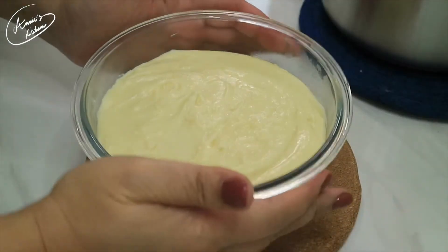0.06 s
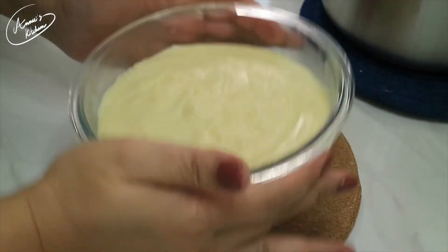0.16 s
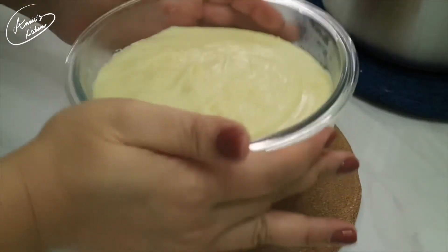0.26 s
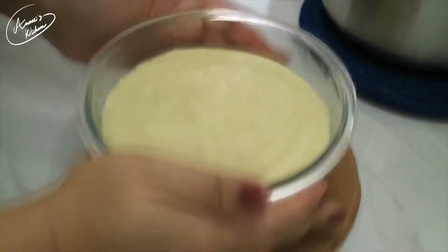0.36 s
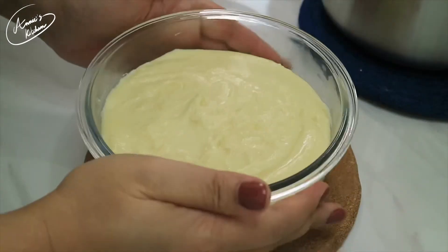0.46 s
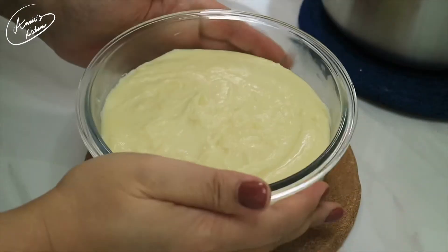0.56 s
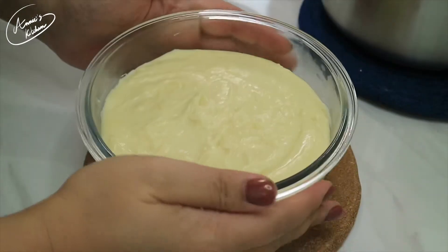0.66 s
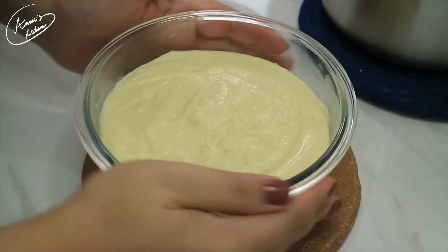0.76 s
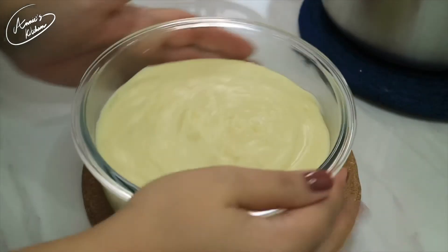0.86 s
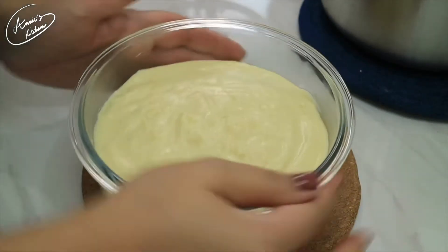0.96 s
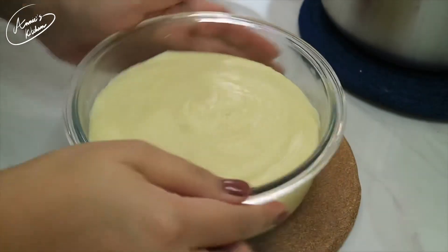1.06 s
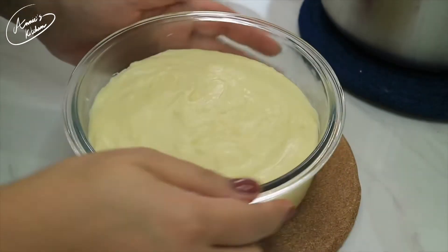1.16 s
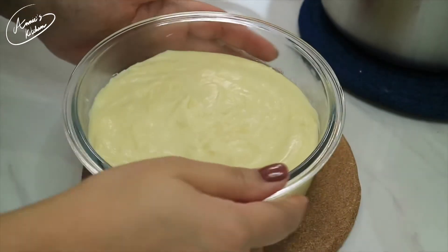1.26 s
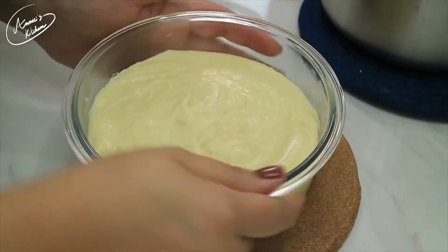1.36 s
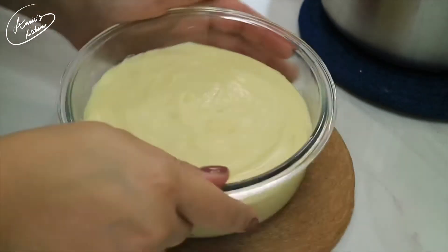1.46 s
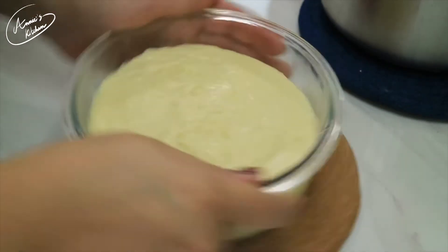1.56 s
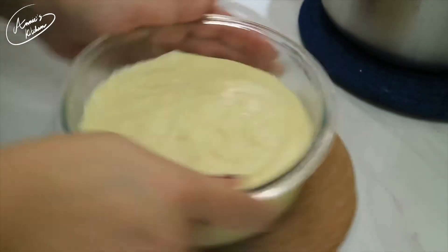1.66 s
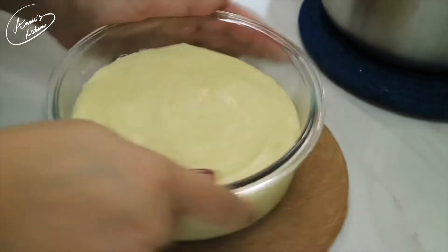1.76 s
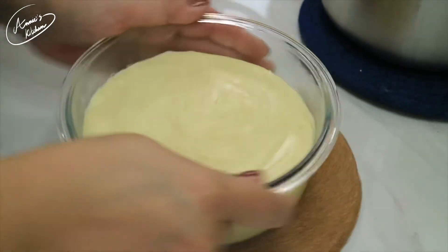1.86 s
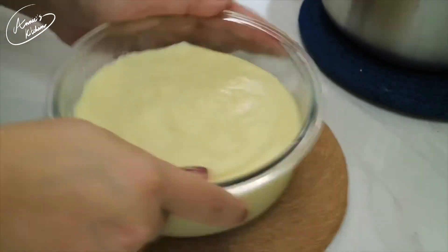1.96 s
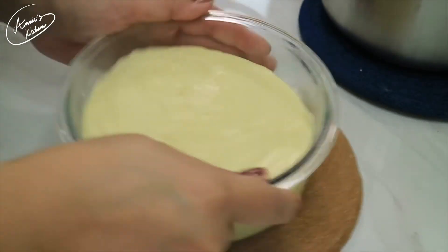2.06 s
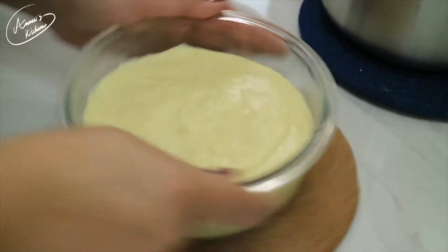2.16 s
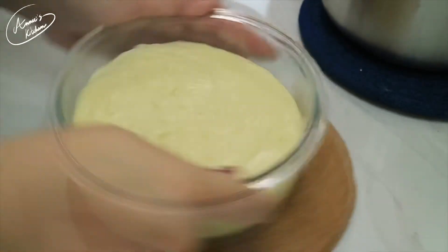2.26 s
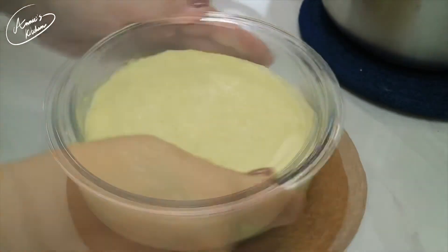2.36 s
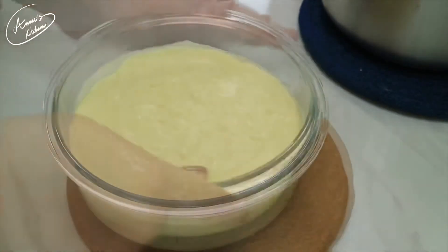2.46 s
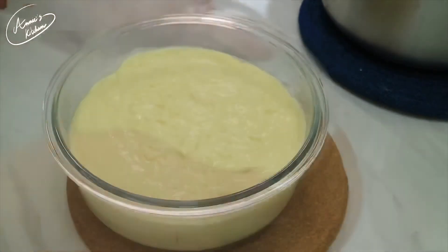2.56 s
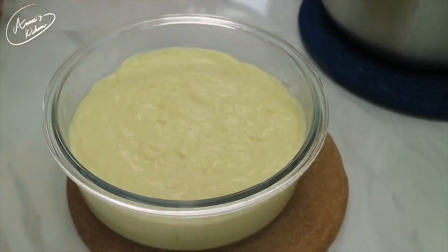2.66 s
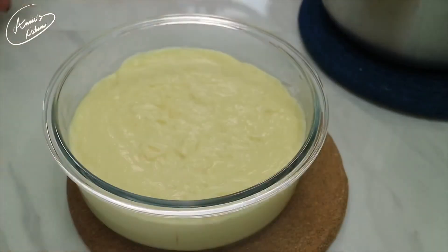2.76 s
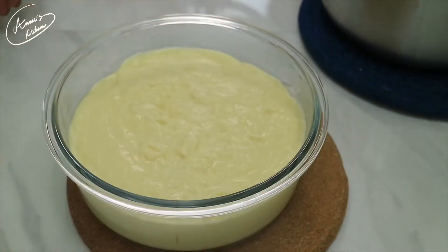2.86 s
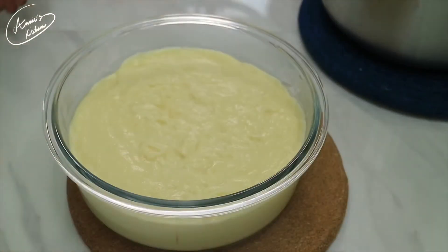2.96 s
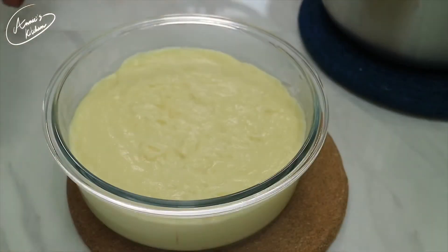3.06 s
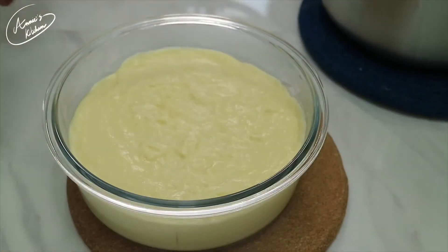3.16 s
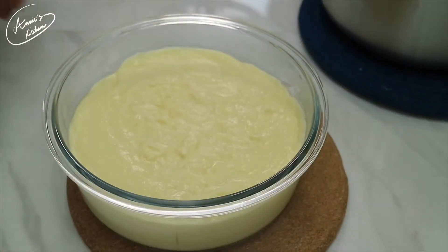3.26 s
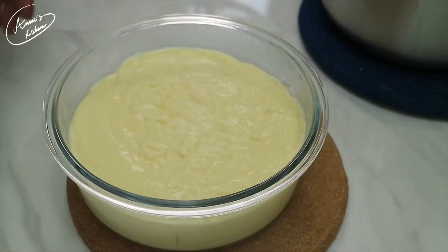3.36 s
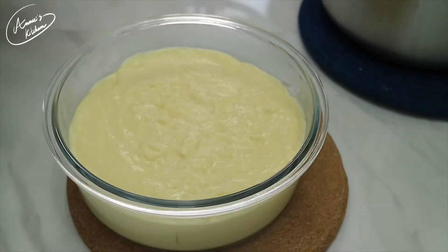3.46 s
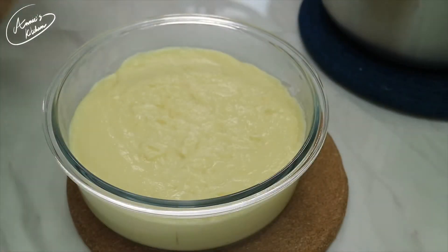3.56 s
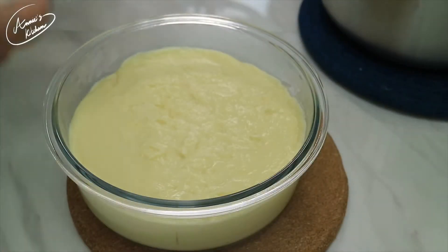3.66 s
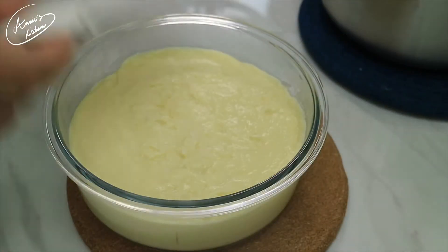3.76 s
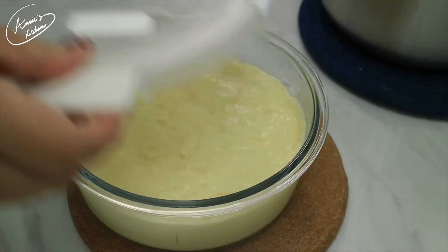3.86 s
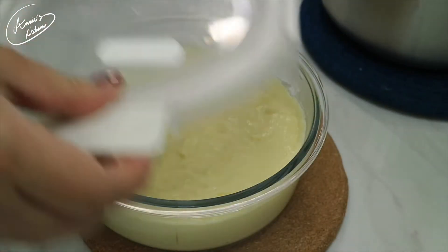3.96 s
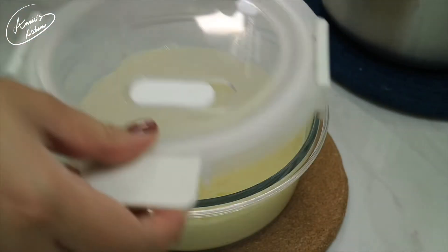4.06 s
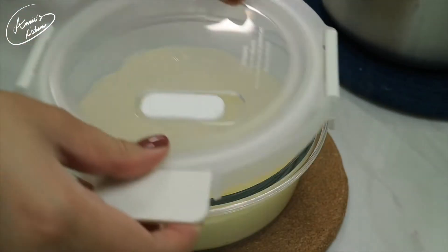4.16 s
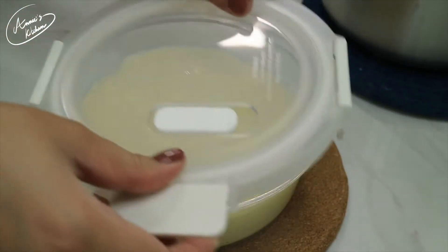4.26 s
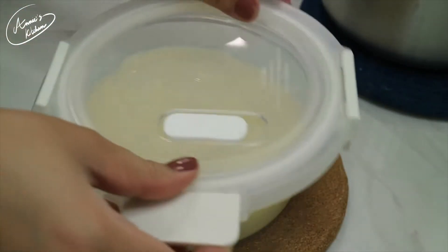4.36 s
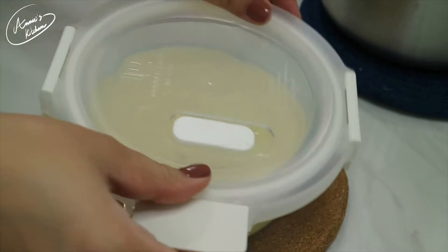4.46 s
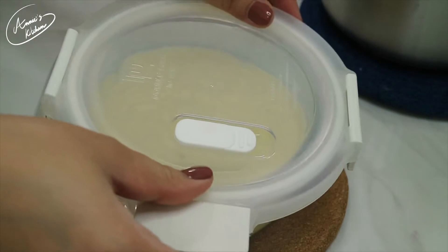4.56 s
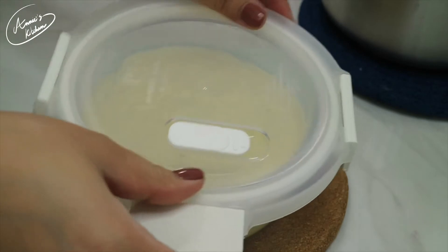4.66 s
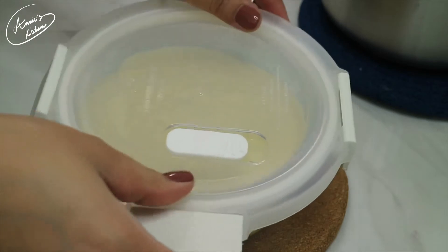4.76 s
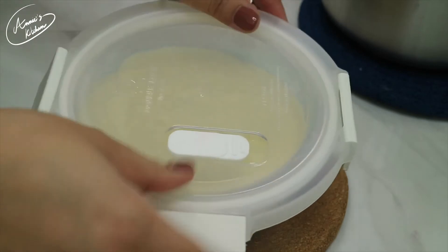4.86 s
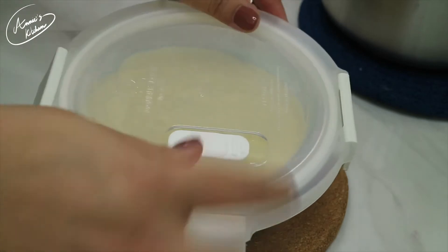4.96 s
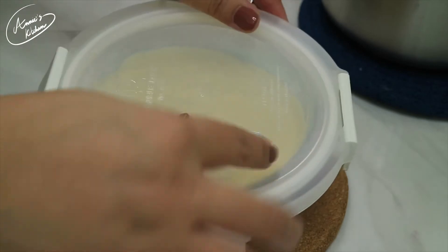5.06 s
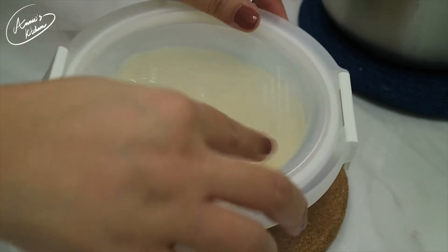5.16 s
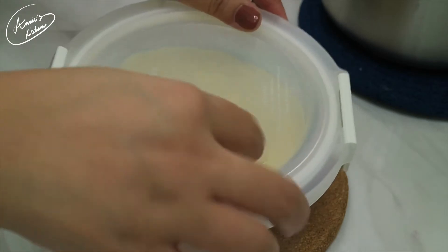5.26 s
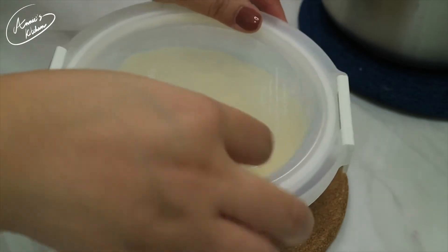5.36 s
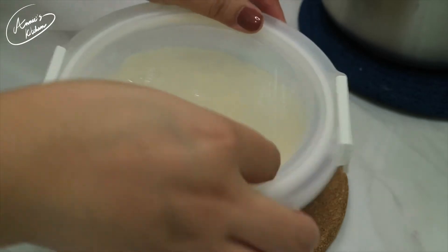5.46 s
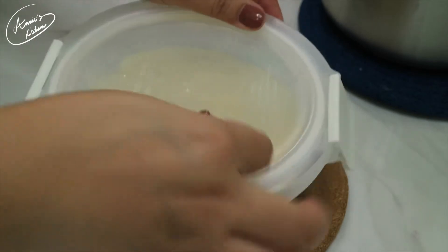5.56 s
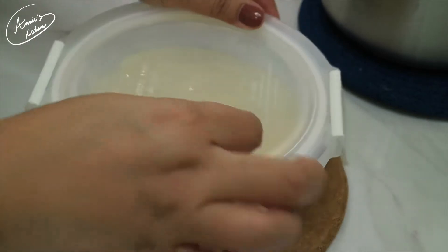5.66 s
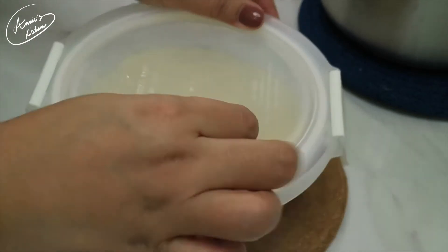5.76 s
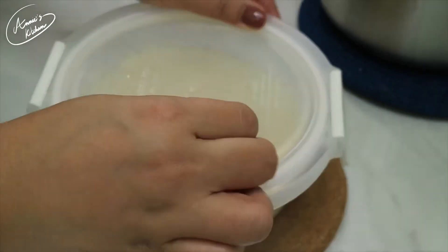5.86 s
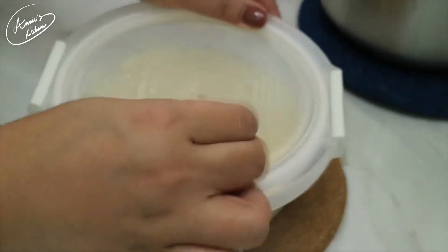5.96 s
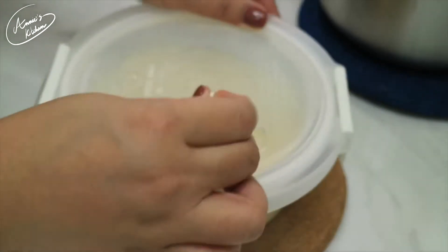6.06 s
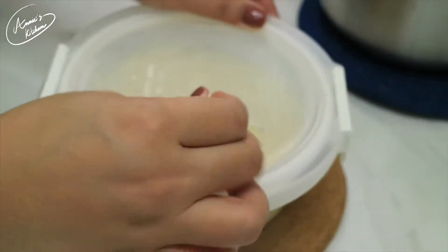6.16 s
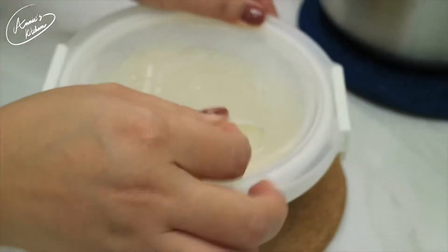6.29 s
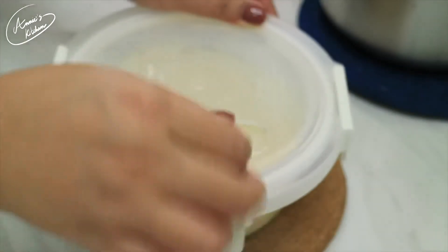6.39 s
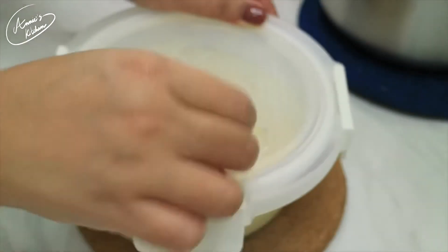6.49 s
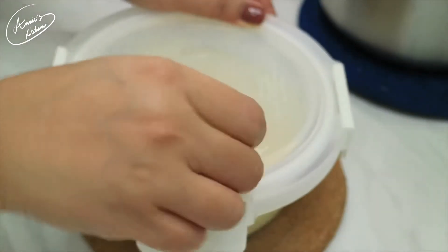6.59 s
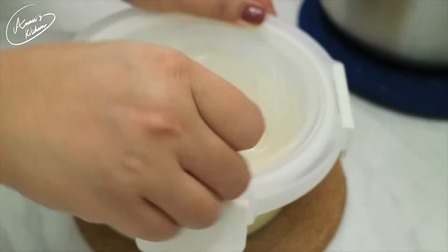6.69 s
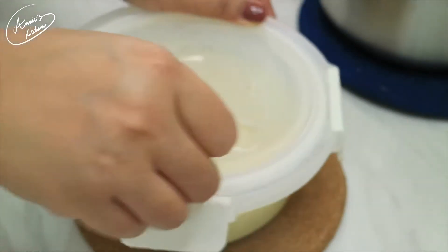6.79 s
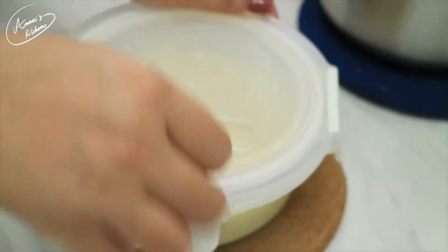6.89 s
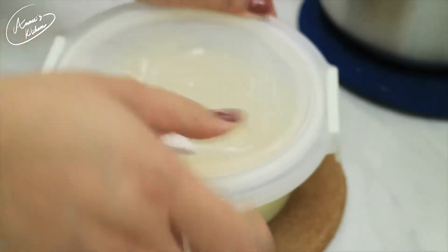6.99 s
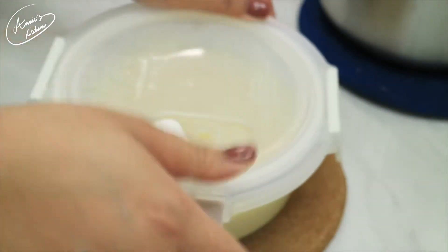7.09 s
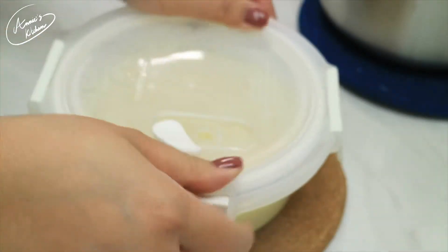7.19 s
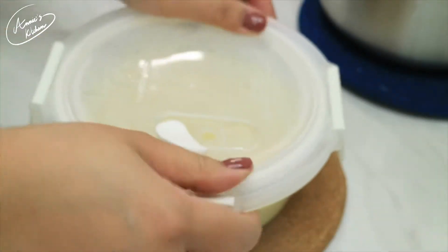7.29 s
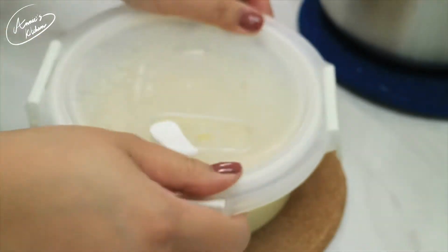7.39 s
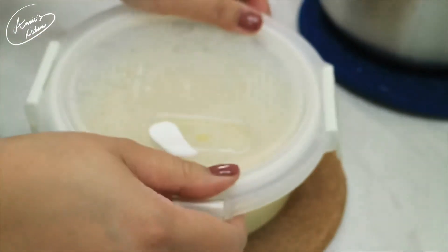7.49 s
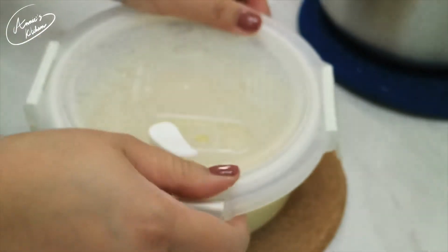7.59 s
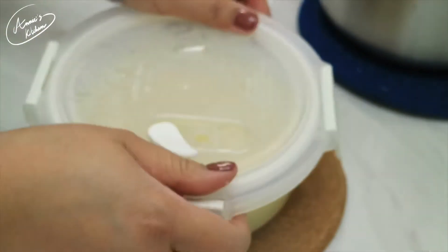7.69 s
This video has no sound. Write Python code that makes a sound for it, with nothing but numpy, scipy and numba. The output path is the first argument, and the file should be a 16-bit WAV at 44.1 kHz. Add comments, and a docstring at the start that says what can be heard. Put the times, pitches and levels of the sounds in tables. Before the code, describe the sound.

One loud, boomy bowl knock opens, leaving a low room hum that slowly rises back. Soft, evenly spaced hissy shuffles follow, ending in a tiny rising squeak. After faint, more distant plastic ticks, a lid meets the glass close by: sharp clicks, scrapes, a strong hollow press with a stuttering rebound, scattered finger taps and a crisp latch click. Small hard-surfaced kitchen, near microphone.

```python
"""A faint fan hums in a quiet kitchen (shaped noise). A filled glass bowl is knocked down on a cork mat
(decaying modes), shuffled about (noise swells) and touched by a squeaking fingertip (rising rough tone).
A plastic lid is fetched from the side, tapped onto the rim and pressed home, rebounding and juddering on
its seal (modes and noise bursts); its flap snaps shut (higher modes).
Gain control ducks at the first thud and creeps back up."""
import sys
import numpy as np
from scipy import signal
from scipy.fft import rfft, irfft
from scipy.io import wavfile
from scipy.ndimage import uniform_filter1d, minimum_filter1d
from numba import njit

SR = 44100
rng = np.random.default_rng(int(sys.argv[2]) if len(sys.argv) > 2 else 0)


def materialize(psi):
    """Save the field psi as 16-bit PCM at rate SR to the path in sys.argv[1].

    A 1-D psi becomes a single channel; in a 2-D psi each row is a channel.
    """
    bounded = np.clip(np.atleast_2d(psi).T, -1, 1)
    quanta = np.round(bounded * 32767).astype(np.int16)
    wavfile.write(sys.argv[1], SR, quanta)


N = 340893
TOP_HZ = 15300  # top of the reverberation and of the output
T = np.arange(SR // 2) / SR  # time axis of one event [s]


def undb(db):
    """Decibels to gain."""
    return 10 ** (np.asarray(db) / 20)


def unit(x):
    """Scale to rms 1."""
    return x / np.sqrt(np.mean(x ** 2))


def attack_unit(x):
    """Scale to rms 1 over the first 10 ms."""
    return x / np.sqrt(np.mean(x[:, :SR // 100] ** 2))


def band(x, hz, kind, order=2):
    """Causal Butterworth filter."""
    return signal.sosfilt(signal.butter(order, hz, kind, fs=SR, output="sos"), x)


def colour(x, points):
    """Shape a spectrum by (frequency [Hz], gain [dB]) points."""
    hz, db = np.transpose(points)
    f = np.fft.rfftfreq(x.shape[-1], 1 / SR) + 1  # +1 Hz avoids log(0)
    gain_db = np.interp(np.log(f), np.log(hz), db)
    return irfft(rfft(x) * undb(gain_db), x.shape[-1])


def add(out, start_s, x):
    """Mix a sound in at a time."""
    i = int(start_s * SR)
    out[:, i:i + x.shape[1]] += x[:, :N - i]


def pan(db):
    """Gains of the two ports for a left-right level difference."""
    return undb(np.array([[db], [-db]]) / 2)


def ring(modes, scatter_db, detune, spread):
    """Decaying modes; each blow weights them anew, and each reaches the two ports in its own phase and level."""
    hz, db, t60_s = np.transpose(modes)
    size, shift, lag, side = rng.standard_normal((4, len(hz)))
    turn = 2j * np.pi * hz * (1 + detune * shift) - np.log(1000) / t60_s
    port_spread = spread * np.minimum(hz / 2000, 1)  # the bass is more alike at both ports
    ports = np.exp(np.outer([1, -1], 1j * lag + side / 2) * port_spread)
    weights = ports * undb(db + scatter_db * size)
    return (weights @ np.exp(np.outer(turn, T))).imag


# crack of a contact: (frequency [Hz], gain [dB])
CRACK_SPECTRUM = [(100, -11), (300, 5), (1000, 5.5), (2200, -3.5), (4500, -6), (7000, -18), (10000, -29),
                  (12500, -40), (15000, -37.5)]


def crack(t60_s, apart):
    """Decaying noise as a burst of countless short-lived modes, partly unlike at the two ports."""
    noise = rng.standard_normal((3, len(T)))
    ports = noise[0] + apart * noise[1:]
    return colour(ports, CRACK_SPECTRUM) * undb(-60 * T / t60_s)


# room air: (frequency [Hz], gain [dB])
AIR_SPECTRUM = [(15, -42.5), (25, -16), (54, -1.5), (77, -28), (118, -7), (167, -4), (326, -2.5),
                (404, -3.5), (450, -10.5), (558, -1.5), (903, -9.5), (1150, -11), (8320, -50),
                (12400, -74.5), (15000, -76)]
# fan resonances: (frequency [Hz], width [Hz], level [dB])
FAN_RESONANCES = [(153.3, 6.6, -63), (535.8, 23.3, -53), (1625, 290, -64.5), (2384, 43, -90)]
AIR_DB = -46


def air():
    """Steady room noise with the fan's resonances; only the bass of the noise is alike at both ports."""
    common = band(rng.standard_normal(N), 166, "low")
    own = band(rng.standard_normal((2, N)), 330, "high", order=1)
    hiss = unit(colour(common * pan(db=3.6) + own, AIR_SPECTRUM))
    fan = np.zeros((2, N))
    for hz, width_hz, db in FAN_RESONANCES:
        edges_hz = [hz - width_hz / 2, hz + width_hz / 2]
        fan += undb(db) * unit(band(rng.standard_normal((2, N)), edges_hz, "band", order=1))
    return undb(AIR_DB) * hiss + fan


# bowl on mat and worktop, before band-limiting: (frequency [Hz], level [dB], t60 [s])
THUD_MODES = [(166.6, -19.5, 0.43), (199, 9, 0.021), (138, -24, .2), (183, -17, .24), (236, -12.5, 0.17),
              (260, -18.5, 0.13), (317, -22.5, 0.32)]
# bowl landing and rocking: (time [s], thud level [dB], glass level [dB], knock lowpass [Hz])
LANDING_BLOWS = [(0.314, -25.5, -9, 6000), (0.3157, 12, -25, 1500), (0.3217, -13, -4, 5000),
                 (0.3282, 7.5, -6.5, 1600), (0.3343, -17, -3, 6000)]


def thuds():
    """The base meets the mat in soft blows that set the worktop booming."""
    out = np.zeros((2, N))
    modes = ring(THUD_MODES, scatter_db=-1, detune=0, spread=0)
    thud = band(band(modes, 340, "low"), 100, "high", order=2)
    thud = thud / np.abs(thud).max() * undb(np.array([[0], [-3.8]]))  # weaker at the right
    for s, thud_db, _, _ in LANDING_BLOWS:
        add(out, s, -undb(thud_db) * thud)
    return out


# glass modes, damped by the filling: (frequency [Hz], level [dB], t60 [s])
GLASS_MODES = [(528, 1, 0.11), (680, 0, 0.11), (1120, -10, 0.2), (1302, -3.5, 0.13), (1435, -2, 0.093),
               (1660, -5.5, 0.11), (1810, -4.5, 0.17), (1868, -2, 0.12), (2050, 0, 0.077),
               (2210, -5, 0.098), (2276, -3, 0.15), (2420, 1, 0.07), (2550, -1.5, .06), (3074, 1.5, 0.05),
               (3206, 6.5, 0.04), (3460, 4, 0.13), (3700, -8, 0.1), (5600, -25, 0.25)]


def chinks():
    """The glass knocks and rings as it rocks; softer contacts have duller knocks."""
    out = np.zeros((2, N))
    for s, _, glass_db, soft_hz in LANDING_BLOWS:
        glass = attack_unit(ring(GLASS_MODES, scatter_db=1.0, detune=0.0012, spread=0.86))
        dull = band(crack(t60_s=0.037, apart=0.63), soft_hz, "low", order=1)
        knock = attack_unit(band(dull, 1298, "high", order=1))
        add(out, s, undb(glass_db) * (undb(-5.0) * glass + undb(-4.0) * knock))
    return out


SHUFFLE_START_S, SHUFFLE_PERIOD_S, PUSH_S, PUSH_DB = 1.423, 0.12, 0.099, -57.5


def shuffle(count):
    """Evenly spaced pushes of the bowl as (centre [s], length [s], level [dB])."""
    return [(SHUFFLE_START_S + k * SHUFFLE_PERIOD_S, PUSH_S, PUSH_DB) for k in range(count)]


# single slides of bowl and hands: (centre [s], length [s], level [dB])
SINGLE_RUBS = [(0.99, 0.13, -62.5), (2.348, 0.12, -58), (2.652, 0.054, -60), (3.365, 0.055, -63),
               (3.495, 0.16, -56.5), (3.625, 0.11, -57), (3.78, 0.11, -62.5), (3.967, 0.14, -60.5),
               (5.228, 0.48, -66.5), (6.577, 0.15, -65)]


def slides():
    """Glass and skin rub over cork: a fine-grained hiss that swells with each push and catches unevenly."""
    t = np.arange(N) / SR
    push = np.zeros(N)
    for s, length_s, db in shuffle(count=8) + SINGLE_RUBS:
        push += undb(db) * np.exp(-(2 * (t - s) / length_s) ** 2)
    grains = rng.standard_normal((2, N)) * undb(1.8 * rng.exponential(size=N))
    catch = undb(1.8 * unit(band(rng.standard_normal(N), 35, "low")))
    rub_spectrum = [(200, -10), (1200, 6.0), (3000, 0.0), (7000, -7.5), (11000, -13.5), (15000, -28)]
    return push * catch * unit(colour(grains, rub_spectrum))


# bowl under a damping fingertip: (frequency [Hz], level [dB], t60 [s])
FINGER_MODES = [(272, -1.5, 0.062), (985, -4, 0.044), (1540, -2, 0.03), (1840, -3, 0.05), (2700, 0, 0.027),
                (3600, -5, 0.02), (5660, -18, 0.043)]
FINGER_AT_S, FINGER_DB = 2.297, -41
SQUEAK_HZ, SQUEAK_RISE_HZ_PER_S, SQUEAK_S, SQUEAK_DB = 1770, 3100, 0.073, -47.5


def fingertip():
    """A fingertip catches on the bowl, ringing it, and slides off in a rough, rising squeak."""
    catch = attack_unit(ring(FINGER_MODES, scatter_db=3.0, detune=0.01, spread=0.8))
    rough = unit(band(rng.standard_normal((2, len(T))), 90, "low"))
    squeak_hz = SQUEAK_HZ + SQUEAK_RISE_HZ_PER_S * T
    tone = np.sin(2 * np.pi * np.cumsum(squeak_hz) / SR)
    swell = np.sin(np.pi * np.minimum(T / SQUEAK_S, 1))
    out = np.zeros((2, N))
    add(out, FINGER_AT_S, undb(FINGER_DB) * catch + undb(SQUEAK_DB) * swell * rough * tone)
    return out


# lid: (frequency [Hz], level [dB], t60 [s])
LID_MODES = [(302, 0, 0.037), (531, 2, 0.059), (663, 3, 0.085), (820, 3, 0.065), (1007, -1.5, 0.03),
             (1147, 0.5, 0.061), (1355, -7.5, 0.12), (1648, 4, 0.038), (1957, 2.5, 0.031),
             (2481, -1, 0.053), (3310, -3, 0.036), (4116, 1.5, 0.032), (4740, -1.5, 0.016),
             (5300, -5, 0.012), (5930, -7, 0.025), (8030, -16, 0.021)]
# bowl bobbing on its mat and stirring the worktop: (frequency [Hz], level [dB], t60 [s])
BOB_MODES = [(102, 1, 0.16), (153.4, 4, 0.22)]
BOB_DB = -25.5
SNAP_T60_S, SNAP_DB = 0.01, -6  # first sharp snap of a contact


def lid_click(db, ring_hz, ring_t60_s, body_db, bright_db, ring_db):
    """One contact rings the plastic and bobs the bowl; its place picks strongest ring, body and edge."""
    modes = attack_unit(ring(LID_MODES, scatter_db=2.5, detune=0.018, spread=0.82))
    main = attack_unit(ring([(ring_hz, 0, ring_t60_s)], scatter_db=0, detune=0, spread=0.88))
    rattle = attack_unit(crack(t60_s=0.099, apart=1.0))
    snap = attack_unit(crack(t60_s=SNAP_T60_S, apart=1.0))
    x = undb(1.0) * modes + undb(ring_db) * main + undb(-1.0) * rattle + undb(SNAP_DB) * snap
    tick = attack_unit(crack(t60_s=0.037, apart=1.0))
    body = attack_unit(band(band(x, 572, "low", order=4), 800, "high", order=2))
    middle = attack_unit(band(x + undb(-3.5) * tick, [720, 2400], "band", order=3))
    edge = attack_unit(band(x + undb(1.5) * tick, 1790, "high", order=4))
    bob = attack_unit(ring(BOB_MODES, scatter_db=0, detune=0.095, spread=0))
    # body a little to the left, edge to the right
    low = (undb(body_db) * body + undb(BOB_DB) * bob) * pan(db=4.5)
    return undb(db) * (low + middle + undb(bright_db) * edge * pan(db=-2.0))


REACH_S, GRIP_S = (2.5, 3.9), (4.3, 7.66)  # hands busy with the lid, from and to


def fingers(span_s, db, count):
    """Tiny dull creaks and taps at random times while the hands shift their grip."""
    rows = []
    for when, soft, pitch, dull in rng.random((count, 4)):
        s = np.interp(when, [0, 1], span_s)
        rows.append((s, db - 6 * soft, 500 + 2000 * pitch, -11 - 8 * dull))
    return taps(rows)


# lid's hard edge tapping: (time [s], level [dB], strongest ring [Hz], brightness re middle [dB])
EDGE_TAPS = [(2.633, -35.5, 1030, -19), (2.764, -40.5, 1150, -14.5), (2.861, -44, 2900, -8.5),
             (3.072, -43.5, 1140, -23), (3.165, -49, 990, -26), (3.34, -38.5, 2080, -8),
             (3.362, -41, 1460, -11), (3.382, -43.5, 1230, -13), (3.512, -45.5, 1640, -5),
             (3.821, -51.5, 2040, -7), (4.139, -36.5, 930, -2.5), (4.186, -37, 910, -9),
             (4.2118, -33.5, 2490, -1), (4.214, -19, 1004, -15), (4.23, -33.5, 930, -8),
             (4.4395, -43, 2690, -9), (4.4597, -37, 830, -9), (4.4677, -32.5, 910, -10.5),
             (4.509, -32.5, 780, -12), (4.5525, -36.5, 2690, -7), (4.7406, -38, 870, -11),
             (4.7461, -29.5, 1020, -12), (5.143, -29.5, 1290, -3.5), (5.273, -44, 1050, -8),
             (5.4942, -18.5, 1075, -6), (5.511, -26, 4167, -1), (5.5135, -27, 2490, -2),
             (5.586, -44, 744, 0), (5.9745, -41, 820, -24), (5.9895, -31.5, 820, -12),
             (6.185, -49, 694, -12), (6.3522, -39.5, 600, -9), (6.827, -42.5, 3800, -9.5),
             (7.173, -38.5, 670, -7), (7.489, -45, 1460, -9.5), (7.5458, -39, 660, -15)]
ARRIVES_S = 4.0  # earlier taps are off to the side
TAP_CYCLES, TAP_BODY_DB = 23, -15  # t60 of the main ring in cycles; the body hardly moves


def taps(rows):
    """Short ticks of the edge; higher main rings die sooner."""
    out = np.zeros((2, N))
    for s, db, hz, bright_db in rows:
        add(out, s, lid_click(db, hz, TAP_CYCLES / hz, TAP_BODY_DB, bright_db, ring_db=-1.0))
    return out


# scuffs of plastic and seal: (end of the 3 ms after the centre [s], length [s], level [dB], brightness [dB])
SEAL_SCRAPES = [(4.2145, 0.0038, -33, 0.5), (4.474, 0.006, -30, -18), (4.751, 0.014, -33.5, -3.5),
                (5.469, 0.017, -36, -14), (5.49, 0.011, -30, -8), (5.515, 0.0083, -24, 0),
                (5.552, .04, -39, -8), (5.984, .02, -29.5, -28), (6.055, 0.0087, -28.5, -8.5),
                (6.738, 0.0074, -31.5, -23), (7.332, .005, -39, -1)]
SCRAPE_DAMP_T60_S = 0.17  # extra decay from the pressing fingers


def scrapes():
    """A quick run of tiny slips, each ringing the lid, which the fingers damp."""
    out = np.zeros((2, N))
    for s, length_s, db, bright_db in SEAL_SCRAPES:
        slips = rng.standard_normal(len(T)) * (rng.random(len(T)) < 2500 / SR)  # mean 2500 slips/s
        slips *= np.exp(-(2 * (T - length_s) / length_s) ** 2)
        slips *= np.sqrt(length_s / 0.0052 / np.sum(slips ** 2))  # energy grows with length
        click = lid_click(db, ring_hz=812, ring_t60_s=0.036, body_db=-4.5, bright_db=bright_db, ring_db=-2.5)
        click = click * undb(-60 * T / SCRAPE_DAMP_T60_S)
        add(out, s - length_s - .003, signal.fftconvolve(click, slips[None], axes=1))
    return out


# seal juddering on the glass: (start [s], length [s], level [dB], ring [Hz])
SEAL_JUDDERS = [(4.223, 0.064, -38, 935), (5.511, 0.088, -30.5, 734), (7.34, 0.083, -33, 650)]
JUDDER_RATE_HZ, JUDDER_T60_S, JUDDER_FADE_DB_PER_S, JUDDER_JITTER_S = 68, 0.061, 73, 0.00151


def judders():
    """The seal sticks and slips in an uneven, fading train that keeps one lid mode ringing."""
    out = np.zeros((2, N))
    for start_s, length_s, db, hz in SEAL_JUDDERS:
        for after_s in np.arange(0, length_s, 1 / JUDDER_RATE_HZ):
            slip = attack_unit(ring([(hz, 0, JUDDER_T60_S)], scatter_db=1.0, detune=0.03, spread=1.0))
            slip_s = start_s + after_s + JUDDER_JITTER_S * rng.standard_normal()
            add(out, slip_s, undb(db - JUDDER_FADE_DB_PER_S * after_s) * slip)
    return out


# hand pressing the lid home, plus at 7.122 s the lid ringing along as the flap snaps and at 7.159 s knocking
# back after it: (time [s], level [dB], # strongest ring [Hz], body re middle [dB], brightness re middle [dB],
# flex re level [dB], left-right [dB])
HAND_PRESSES = [(4.4802, -28, 571, 2.5, -18, -20, -0.5), (5.4941, -14.5, 550, -3.5, -17, -25, -1),
                (5.9376, -19.5, 517, 2.5, -7, -3.5, 1), (6.0248, -28.5, 558, 2, -20, -18, -2.5),
                (6.09, -37.5, 530, 5.5, -26, -27, 0.5), (6.7345, -33, 567, 2.5, -23, -20, 1),
                (6.773, -49, 517, 12, -34, -13, -3), (7.122, -35, 644, -1.5, -18, -26, -2),
                (7.159, -44, 460, 6, -14, -1, 4), (7.325, -26.5, 604, 7, -29, -13.5, 2.5)]
# whole lid flexing under the palm: (frequency [Hz], level [dB], t60 [s])
FLEX_MODES = [(280, -6, 0.052), (328.6, 1, 0.083)]
PRESS_T60_S, PRESS_RING_DB = 0.052, 3.5  # strongest ring
REBOUND_S, REBOUND_DB, REBOUND_BODY_DB, REBOUND_BRIGHT_DB = 0.035, -18, -4, -13


def presses():
    """Each press knocks and flexes the whole lid, which rebounds more weakly on its seal at the same pitch."""
    out = np.zeros((2, N))
    for s, db, hz, body_db, bright_db, flex_db, pan_db in HAND_PRESSES:
        knock = lid_click(db, hz, PRESS_T60_S, body_db, bright_db, PRESS_RING_DB)
        flex = attack_unit(ring(FLEX_MODES, scatter_db=3.5, detune=0.022, spread=0.6))
        rebound = lid_click(db + REBOUND_DB, hz, PRESS_T60_S, REBOUND_BODY_DB, REBOUND_BRIGHT_DB, PRESS_RING_DB)
        add(out, s, (knock + undb(db + flex_db) * flex) * pan(pan_db))
        add(out, s + REBOUND_S, rebound * pan(pan_db))
    return out


# locking flap springing over the rim: (time [s], level [dB], lowpass [Hz])
FLAP_SNAPS = [(7.1202, -32, 6000), (7.1221, -24, 9750), (7.545, -37, 5460)]
# flap: (frequency [Hz], level [dB], t60 [s])
FLAP_MODES = [(1720, 19.5, 0.031), (1910, 17, 0.02), (2250, 13.5, 0.031), (2420, 4, 0.12),
              (3560, 12.5, 0.015), (4040, 9, 0.016), (4723, 9.5, 0.019), (5260, 4, 0.014),
              (7760, -3, 0.016), (8500, -3, 0.013)]


def latches():
    """The small stiff flap rings higher and shorter than the lid; a gentler snap has less treble."""
    out = np.zeros((2, N))
    for s, db, top_hz in FLAP_SNAPS:
        modes = ring(FLAP_MODES, scatter_db=0.5, detune=0.0049, spread=1.0)
        flap = modes + undb(2.5) * attack_unit(crack(t60_s=0.031, apart=0.36))
        flap = band(band(flap, 1670, "high", order=5), top_hz, "low", order=5)
        add(out, s, undb(db) * attack_unit(flap) * pan(db=-2.5))
    return out


# reverberation bands: (nominal centre [Hz], t60 [s], relative level [dB])
ROOM_BANDS = [(141, 0.5, -5), (540, 0.3, 0), (1756, 0.36, -2), (5100, 0.33, -4), (12200, 0.22, 2.5)]


def kitchen(x):
    """Dense reflections from worktop and walls, unlike at the two ports; the top band dies first."""
    hz, t60_s, db = np.transpose(ROOM_BANDS)
    noise = rng.standard_normal((2, len(T)))
    edges_hz = np.r_[40, np.sqrt(hz[1:] * hz[:-1]), TOP_HZ]
    tail = np.zeros((2, len(T)))
    for k in range(len(hz)):
        decay = undb(db[k] - 60 * T / t60_s[k])
        tail += band(noise, edges_hz[k:k + 2], "band", order=3) * decay
    tail *= np.clip((T - .003) / 0.0059, 0, 1)  # 3 ms predelay, then fade-in
    tail /= np.sqrt(np.sum(tail ** 2) / 2)
    return signal.fftconvolve(x, tail, axes=1)[:, :N]


PORT_LAG_SAMPLES = 5
LID_LOWPASS_HZ = 10500  # lid sounds are gently cut above this


def scene():
    """Bowl and lid close by, the fetching with more reverberation, over the room's air."""
    thud, glass = thuds(), chinks()
    near_taps = taps([row for row in EDGE_TAPS if row[0] >= ARRIVES_S])
    near = presses() + near_taps + latches() + scrapes() + judders() + fingers(GRIP_S, db=-48.0, count=30)
    far_taps = taps([row for row in EDGE_TAPS if row[0] < ARRIVES_S])
    far = far_taps + fingers(REACH_S, db=-52.0, count=14)
    near, far = band(np.array([near, far]), LID_LOWPASS_HZ, "low", order=3)
    direct = thud + glass + near + undb(1.5) * far + slides() + fingertip()
    direct[0] = np.roll(direct[0], PORT_LAG_SAMPLES)  # later at the left port
    sent = undb(-13) * thud + undb(-7.0) * glass + undb(-8.5) * near + undb(-1.0) * far
    return direct + kitchen(sent) + air()


@njit
def held_peak(size, ceiling, hold, fall):
    """Peak follower: jumps up at once, waits, then sinks back to the ceiling."""
    out, peak, age = np.empty(len(size)), ceiling, 0.
    for i in range(len(size)):
        age += 1
        if size[i] > peak:
            peak, age = size[i], 0.
        elif age > hold:
            peak = max(peak * fall, ceiling)
        out[i] = peak
    return out


def gain_control(x, ceiling, hold_s, recover_db_per_s):
    """Turns down ahead of a peak above the ceiling, holds, then recovers at a steady dB rate."""
    fall = float(undb(-recover_db_per_s / SR))
    peak = held_peak(np.abs(x).max(axis=0), float(ceiling), float(hold_s * SR), fall)
    gain = minimum_filter1d(ceiling / peak, size=201)
    return x * uniform_filter1d(gain, size=201)


def record(dry):
    """Drops the deep bass, rides the gain and cuts the top."""
    bass_cut = band(dry, 59.2, "high", order=4)
    held = gain_control(bass_cut, ceiling=0.85, hold_s=0.21, recover_db_per_s=9.5)
    return signal.sosfilt(signal.ellip(8, .2, 70, TOP_HZ, fs=SR, output="sos"), held)


dry = scene()
out = record(dry)
materialize(out)
```